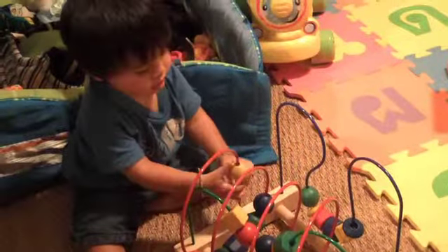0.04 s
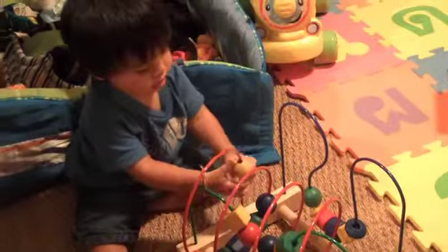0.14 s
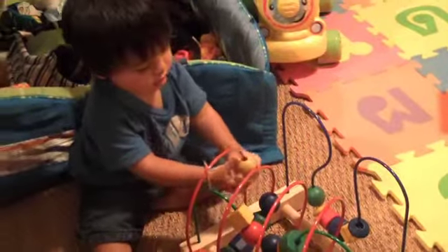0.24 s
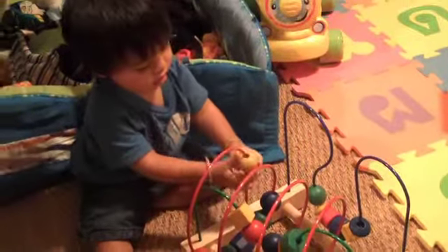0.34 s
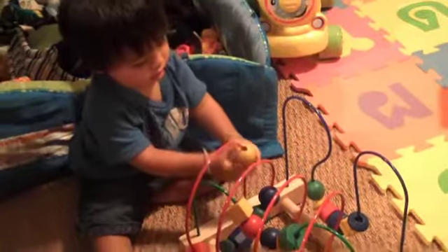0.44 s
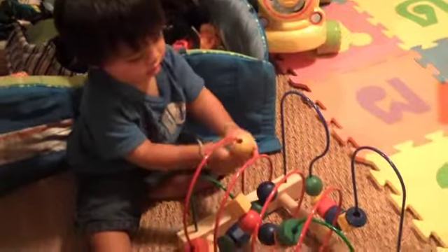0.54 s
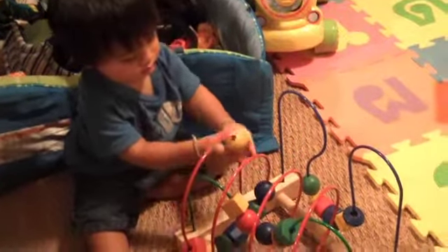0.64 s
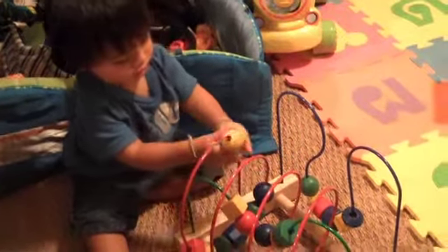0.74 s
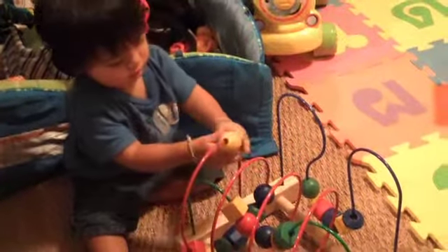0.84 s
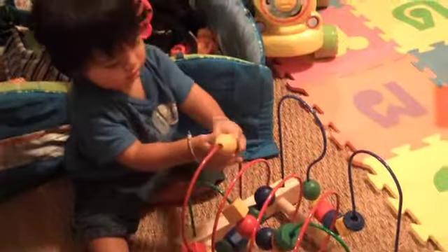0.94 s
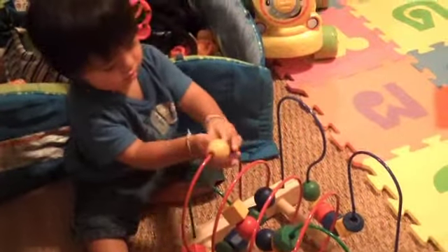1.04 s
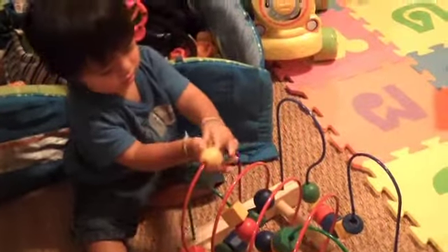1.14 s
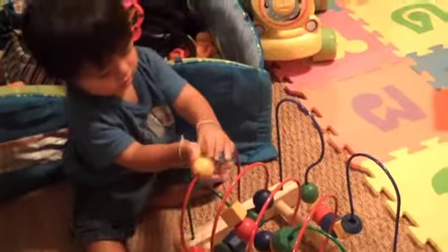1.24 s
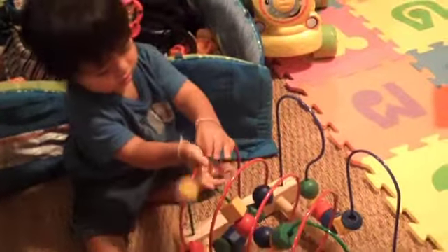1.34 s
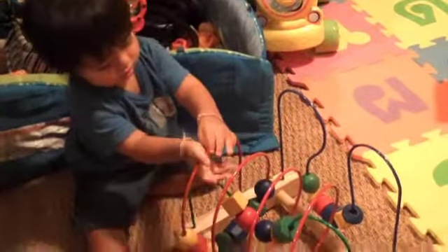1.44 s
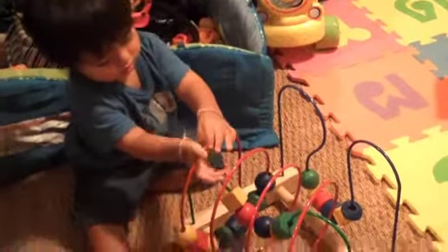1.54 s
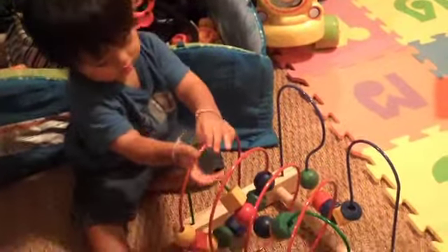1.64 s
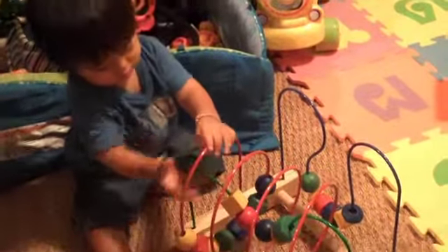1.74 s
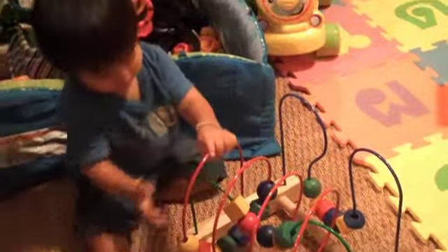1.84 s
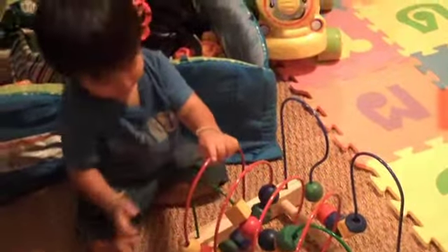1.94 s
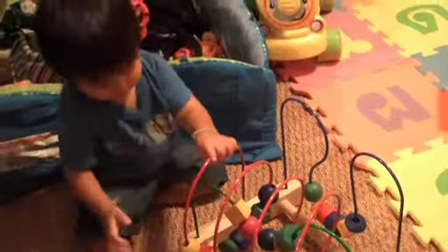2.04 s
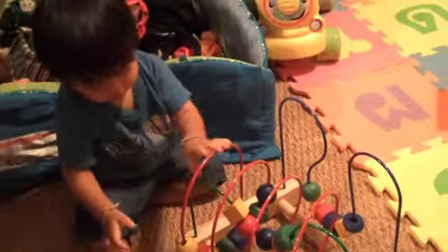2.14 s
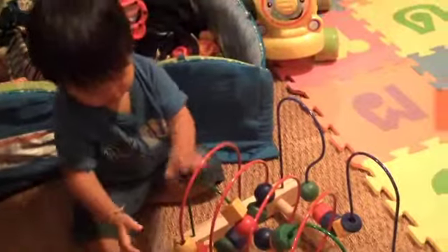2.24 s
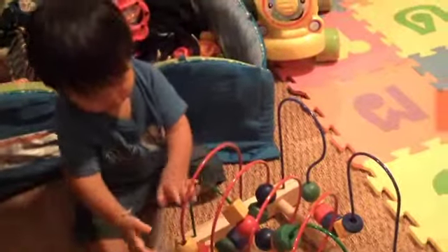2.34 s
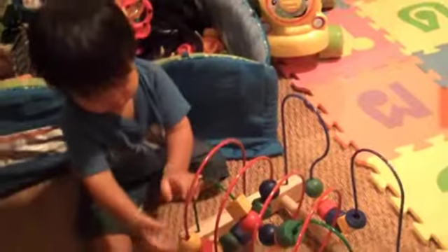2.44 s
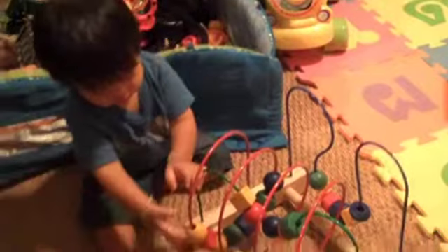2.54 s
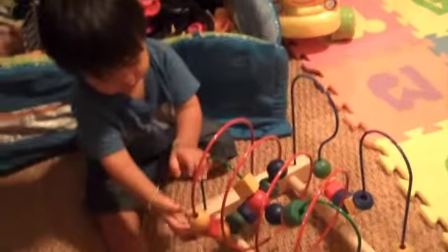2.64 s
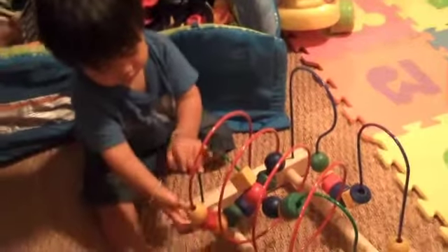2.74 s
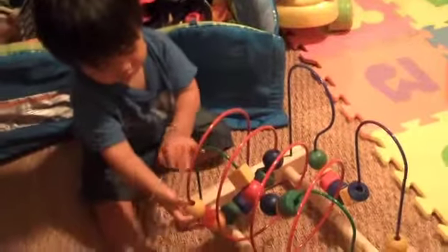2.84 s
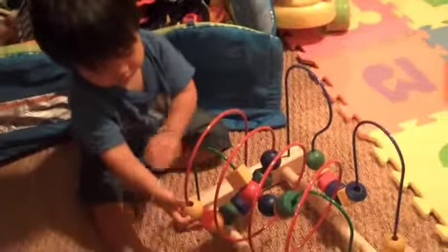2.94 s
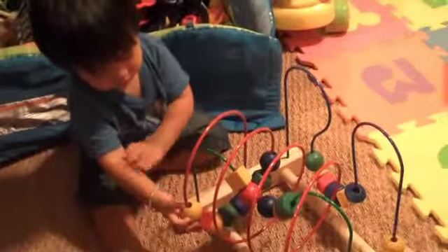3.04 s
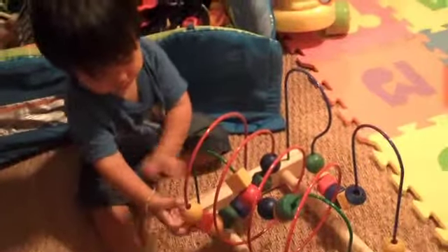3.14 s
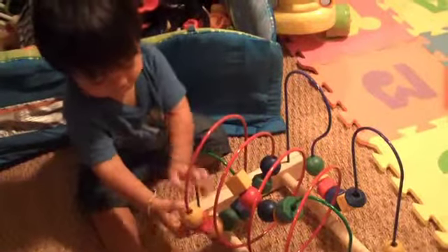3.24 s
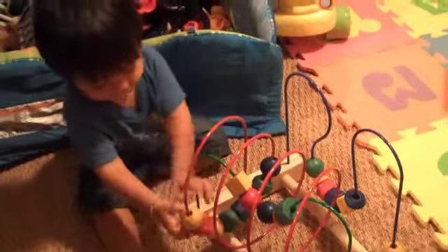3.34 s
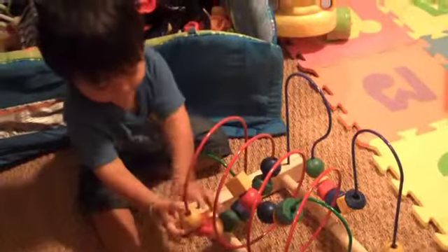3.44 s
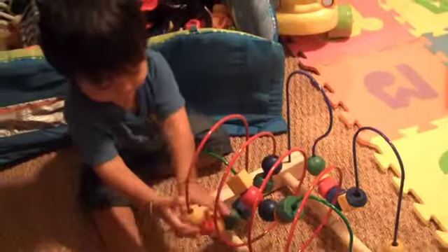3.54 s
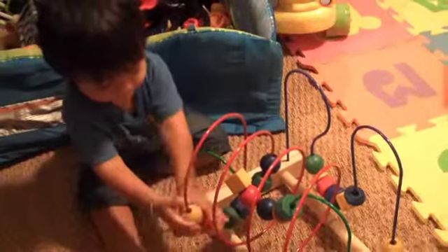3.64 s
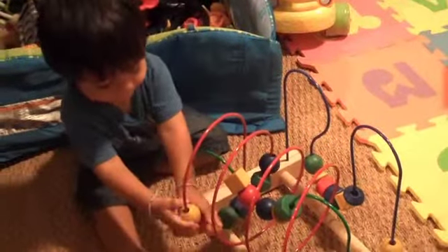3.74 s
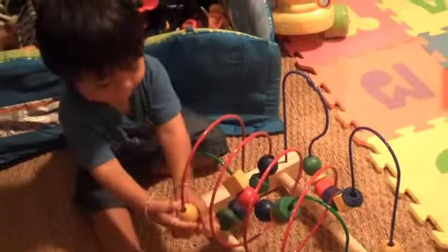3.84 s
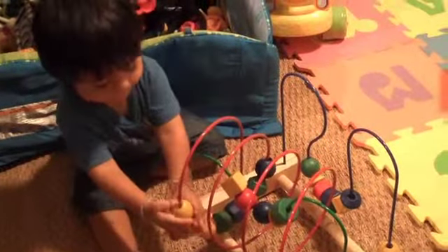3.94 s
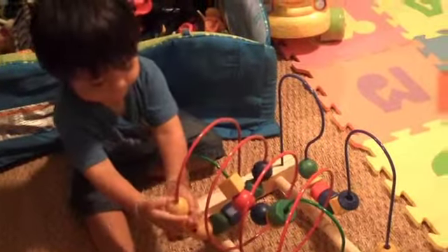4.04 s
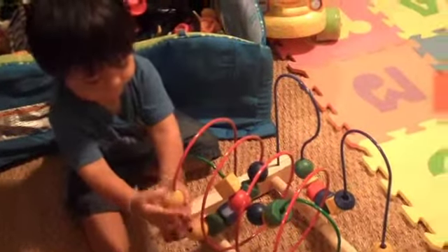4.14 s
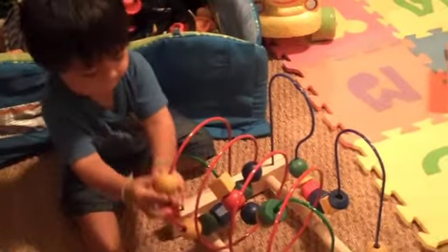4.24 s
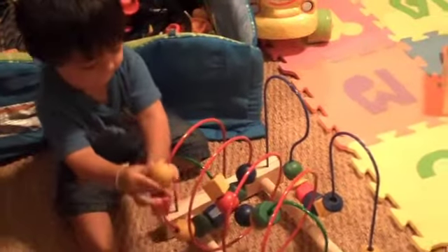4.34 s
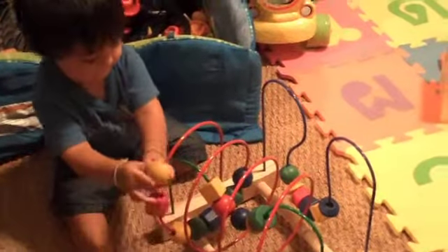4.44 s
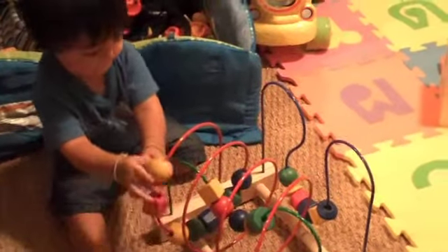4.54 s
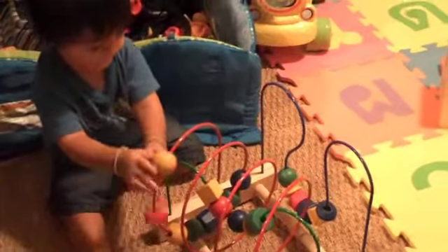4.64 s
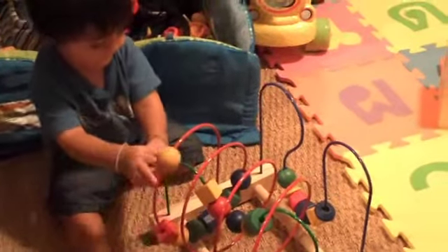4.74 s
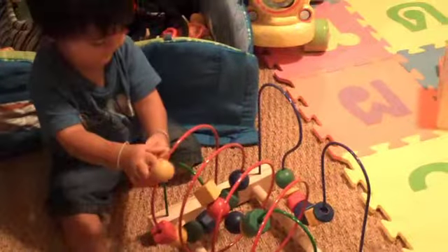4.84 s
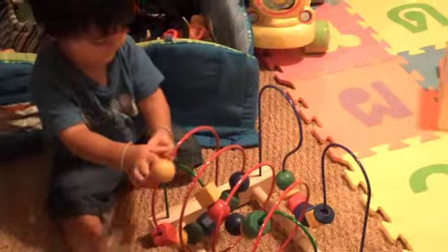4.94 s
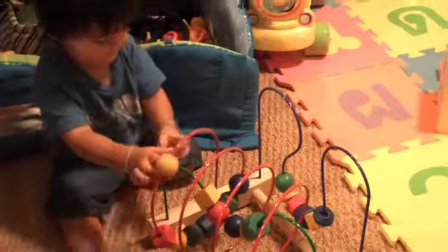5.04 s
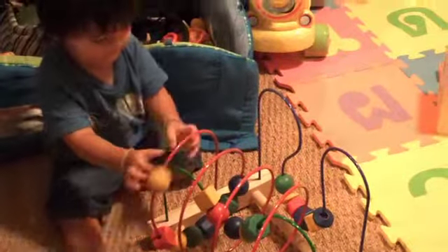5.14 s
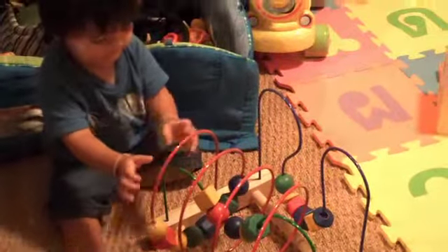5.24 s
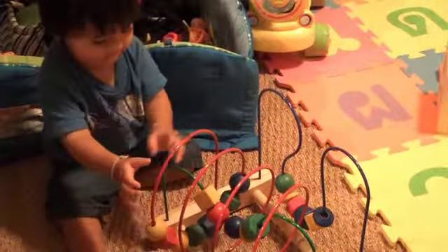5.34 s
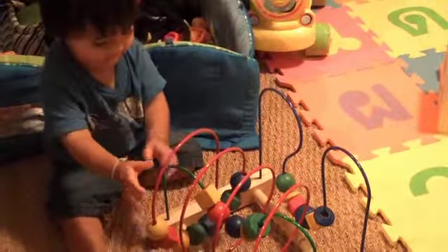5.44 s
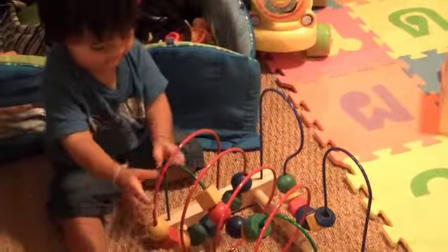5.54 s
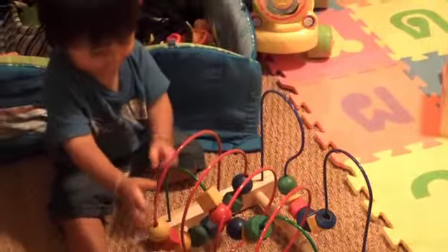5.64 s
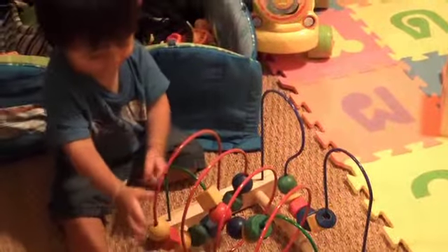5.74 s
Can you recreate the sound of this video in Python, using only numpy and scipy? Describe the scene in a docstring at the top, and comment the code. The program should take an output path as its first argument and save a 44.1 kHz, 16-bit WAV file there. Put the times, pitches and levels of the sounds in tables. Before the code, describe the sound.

A wooden bead maze is handled indoors, giving scattered light taps and three sharp clacks above a quiet hum.

```python
"""Wooden beads clack and tap on the wire loops of a bead maze as a child plays in a small carpeted room.
Three times a bead lands with a sharp clack, twice after a short skid; handled beads tap softly.
These contacts make the wooden frame and its wires ring. Fingers brush and rub faintly, and there are
soft low thumps. Under it all lie a throbbing appliance hum and still room air."""
import sys
import numpy as np
from scipy import signal
from scipy.fft import rfft, irfft, next_fast_len
from scipy.io import wavfile
from scipy.ndimage import uniform_filter1d

SR = 44100
rng = np.random.default_rng(int(sys.argv[2]) if len(sys.argv) > 2 else 0)


def to_wav(sig):
    """Store sig (one row per channel, or 1-D mono) as 16-bit WAV at the path in sys.argv[1].

    Samples outside -1..1 are clipped; the rate is SR.
    """
    pcm = np.clip(np.atleast_2d(sig), -1, 1) * 32767
    pcm = np.round(pcm).astype(np.int16)
    wavfile.write(sys.argv[1], SR, pcm.T)  # frames by channels


N = 254623
T = np.arange(int(.5 * SR)) / SR  # time since a hit [s]

# appliance hum: (pitch [Hz], level against the strongest tone [dB])
HUM_TONES = [(237, 0), (563, -15), (207, -16.5)]
# room air: (frequency [Hz], level [dB])
AIR_SPECTRUM = [(20, -0.5), (60, -15.5), (160, -14.5), (300, -13), (600, -15), (1000, -17.5), (1640, -20),
                (3500, -28), (7100, -35.5), (8500, -46.5), (11000, -66)]
# beads nudged against wire and neighbours: (time [s], level [dB], boosted pitch [Hz], contact length [s])
BEAD_TAPS = [(1.248, -65, 2870, .0016), (1.4195, -38.5, 2850, 0.00096), (2.544, -40, 2840, 0.012),
             (2.561, -44.5, 2280, .003), (2.6422, -43.5, 2990, 0.0032), (2.789, -59, 2010, .0018),
             (2.873, -56.5, 1850, 0.0012), (3.206, -58, 1900, .001), (3.235, -41, 2890, 0.00089),
             (3.540, -50.5, 1900, 0.0056), (3.613, -52.5, 2900, .0018), (3.618, -45.5, 2900, 0.0011),
             (3.702, -58, 3320, .0005), (3.824, -57.5, 1860, .001), (3.88, -59, 2400, .001),
             (4.162, -52, 2030, .0016), (4.317, -51, 1870, 0.00085), (4.694, -41, 1200, 0.0032),
             (4.934, -61.5, 1190, .0027), (4.995, -44.5, 2186, .002), (5.149, -61.5, 1930, .0019),
             (5.212, -60.5, 2200, .001), (5.251, -36.5, 2800, 0.0026)]
# tones of a bead held against its wire: (pitch [Hz], level [dB], time to fade by 60 dB [s])
HELD_BEAD_TONES = [(1053, -9.5, 0.14), (1175, -5.5, 0.184), (1250, -9.5, 0.37), (1408, -13.5, 0.054),
                   (1767, -5, 0.21), (1880, -3, .095), (2080, -9, .18), (2203, -1, .15), (2240, -12, .14),
                   (2333, -2, 0.158), (2480, -15.5, 0.32), (2750, -8.5, 0.089), (2891, 2, 0.067),
                   (2934, -8, 0.026), (3070, -19.5, 0.18), (3014, -6.5, 0.17), (3404, -2, .1),
                   (3900, -6, .094), (4023, 0.5, 0.095), (4324, -2, 0.074)]
# wooden clatter as the room returns it: (frequency [Hz], level [dB])
CLATTER_SPECTRUM = [(150, -29), (700, -16.5), (960, -12), (1080, 4), (1330, 3.5), (1500, -4), (1850, 5),
                    (2350, -3), (2570, 0), (2930, 4), (3550, -2), (5000, -8), (6500, -15.5), (8500, -33)]
# beads skidding down a wire: (start [s], end [s], first level [dB], last level [dB])
BEAD_SKIDS = [(1.341, 1.407, -51.5, -54.5), (4.671, 4.703, -46, -47.5)]
# beads landing: (time [s], ring level [dB], boosted pitch [Hz], snap level [dB], snap pitch [Hz],
# snap fade time [s], thud level [dB])
BEAD_LANDINGS = [(1.4624, -31.5, 2900, -9.5, 4950, 0.0048, -24.5),
                 (4.7127, -28.5, 2810, -15.5, 4730, 0.0058, -31.5),
                 (5.2747, -30, 2336, -8.5, 5550, 0.0018, -30.5)]
# tones of the frame and wires: (pitch [Hz], level [dB], time to fade by 60 dB [s])
FRAME_TONES = [(1157, -12.4, 0.29), (1266, -4.7, 0.2), (1375, -6.5, 0.22), (1585, -9.7, 0.18),
               (1733, -13.2, 0.27), (1828, -14.5, 0.32), (1877, -12.4, 0.23), (1981, -15.0, 0.36),
               (2073, -12.9, 0.29), (2114, -3.1, 0.23), (2194, -2.1, 0.15), (2243, -5.4, 0.21),
               (2377, 0.0, 0.18), (2466, -7.1, 0.23), (2600, -18.7, 0.35), (2646, -13.6, 0.33),
               (2737, -10.0, 0.23), (2786, -9.6, 0.21), (2875, -0.7, 0.15), (3027, -4.1, 0.15),
               (3161, -15.0, 0.27), (3457, -14.3, 0.23), (3593, -13.1, 0.21), (3778, -12.5, 0.21),
               (3937, -12.2, 0.18), (4027, -9.4, 0.16), (4140, -14.1, 0.2), (4238, -15.9, 0.23),
               (4325, -19.4, 0.28), (5064, -17.5, 0.22)]
# soft low thumps: (time [s])
LOW_THUMP_TIMES = [1.809, 1.843, 5.069, 5.638]
# fingers brushing a wire: (frequency [Hz], level [dB])
BRUSH_SPECTRUM = [(2500, -14), (4000, 0.5), (4700, -8.5), (5500, -3), (6200, -16), (7100, -1.5),
                  (8500, -29)]
# wood rubbing on wire: (frequency [Hz], level [dB])
RUB_SPECTRUM = [(800, -20), (1200, -0.5), (1550, -2), (2100, -8), (3000, -12), (5000, -20),
                (9000, -39.5)]


def gain(db):
    """Turn decibels into a number to multiply by."""
    return 10 ** (np.asarray(db) / 20)


def unit(x):
    """Scale a signal to an average strength (rms) of 1."""
    return x / np.sqrt(np.mean(x ** 2))


def fade(seconds):
    """Die away after a hit, falling 60 dB in the given time."""
    return np.exp(-np.log(1000) * T / seconds)


def shape(x, curve):
    """Filter by a curve of dB against Hz, keeping hits sharp (minimum phase)."""
    size = 2 * next_fast_len(len(x))
    hz = np.maximum(np.fft.rfftfreq(size, 1 / SR), 1)
    cepstrum = irfft(np.log(gain(curve(hz))))
    # fold the filter so that nothing sounds before the hit
    cepstrum[1:size // 2] *= 2
    cepstrum[size // 2 + 1:] = 0
    return irfft(rfft(x, size) * np.exp(rfft(cepstrum)))[:len(x)]


def noise(spectrum, size):
    """Noise of strength 1, coloured by (frequency [Hz], level [dB]) points."""
    hz, db = np.transpose(spectrum)
    bins = np.maximum(np.fft.rfftfreq(size, 1 / SR), 1)
    strength = gain(np.interp(np.log(bins), np.log(hz), db))
    return unit(irfft(strength * np.exp(2j * np.pi * rng.random(len(bins))), size))


def drift(rate_hz):
    """A slow, smooth random wander of strength 1."""
    hold = int(SR / rate_hz)
    steps = np.repeat(rng.standard_normal(N // hold + 1), hold)
    return unit(uniform_filter1d(uniform_filter1d(steps, hold), hold)[:N])


def add(track, start_s, sound):
    """Mix a sound into the track at the given time."""
    i = int(start_s * SR)
    track[i:i + len(sound)] += sound[:N - i]


def hum_and_air():
    """An appliance hum throbs evenly and wanders a little, over soft air noise."""
    throb_hz, throb_db, peak_s = 3.16, 2.3, 0.23
    t = np.arange(N) / SR
    tones = sum(gain(db) * np.sqrt(2) * np.sin(2 * np.pi * hz * t + 0.13 * drift(2.9))
                for hz, db in HUM_TONES)
    throb = np.cos(2 * np.pi * throb_hz * (t - peak_s))
    hum = tones * gain(-65.5 + throb_db * throb + drift(7))
    air = noise(AIR_SPECTRUM, N) * gain(-66.5 + .4 * drift(5))
    return hum + air


def toy_ring(tones, treble_db, boost_hz, boost_db, tones_db, clatter_s, room_db):
    """One hit on the toy: ringing tones, a quick clatter and the room's fading echo."""
    hz, db, fade_s = np.transpose(tones)[:, :, None]
    # every hit shares its energy among the tones a little differently
    share = gain(db + rng.standard_normal(db.shape))
    share /= np.sqrt(np.sum(share ** 2) / 2)
    waves = np.sin(2 * np.pi * (hz * T + rng.random(hz.shape)))
    ringing = np.sum(share * fade(fade_s) * waves, axis=0)
    clatter = noise(CLATTER_SPECTRUM, len(T)) * (fade(clatter_s) + gain(room_db) * fade(0.45))
    # a harder hit holds more treble; the spot where it lands boosts one pitch
    treble = lambda f: treble_db / (1 + (3500 / f) ** 8)
    boost = lambda f: boost_db * np.exp(-(np.log(f / boost_hz) / 0.037) ** 2)
    return shape(gain(tones_db) * ringing + gain(-3.5) * clatter, lambda f: treble(f) + boost(f))


def bead_taps():
    """Each light tap builds up while the bead chatters on its wire; the hand damps the ring."""
    out = np.zeros(N)
    for start, db, boost_hz, contact_s in BEAD_TAPS:
        treble_db = 0.74 * (db + 32)  # firmer taps are brighter
        ring = toy_ring(HELD_BEAD_TONES, treble_db, boost_hz, boost_db=6.5,
                        tones_db=-2.5, clatter_s=0.097, room_db=-17.5)
        add(out, start, gain(db) * ring * np.minimum(T / contact_s, 1))
    return out


def bead_skids():
    """A sliding bead chatters in tiny dull contacts that grow as it gathers speed."""
    contacts_per_s = 1500
    out = np.zeros(N)
    for start, end, first_db, last_db in BEAD_SKIDS:
        size = int((end - start) * SR)
        progress = np.arange(size) / size
        contacts = (rng.random(size) < contacts_per_s / SR) * rng.standard_normal(size)
        speed = np.minimum(2 * progress, 1)  # the bead starts from rest
        force = unit(contacts) * speed * gain(first_db + (last_db - first_db) * progress)
        ring = toy_ring(HELD_BEAD_TONES, treble_db=-22, boost_hz=2000, boost_db=4,
                        tones_db=-4, clatter_s=0.089, room_db=-20)
        add(out, start, signal.fftconvolve(force, ring) / np.sqrt(np.sum(ring ** 2)))
    return out


def bead_clacks():
    """A bead lands: its own brief high snap, a knock and a thud come first, then the toy rings."""
    out = np.zeros(N)
    for start, ring_db, boost_hz, snap_db, snap_hz, snap_s, thud_db in BEAD_LANDINGS:
        overtone = gain(-14.5) * np.sin(2 * np.pi * 1.27 * snap_hz * T)
        snap = (np.sin(2 * np.pi * snap_hz * T) + overtone) * fade(snap_s)
        knock = gain(-27.5) * np.sin(2 * np.pi * 2100 * T) * fade(.006)
        thud = -gain(thud_db) * fade(0.0032)
        # the contact takes a moment, which softens the highest treble
        hit = shape(gain(snap_db) * (snap + knock) + thud, lambda f: -30 / (1 + (8000 / f) ** 12))
        treble_db = 0.8 * (snap_db + 15.5)  # a sharper snap makes the ring brighter
        ring = toy_ring(FRAME_TONES, treble_db, boost_hz, boost_db=4.5,
                        tones_db=-2.5, clatter_s=0.14, room_db=-11)
        add(out, start, hit + gain(ring_db) * ring * (1 - fade(.006)))
    return out


def low_thumps():
    """Soft, very deep thumps that ebb away: downward at each clack, upward at the listed times."""
    out = np.zeros(N)
    thump = fade(0.7) * (1 - fade(0.0031))
    for start, *_, thud_db in BEAD_LANDINGS:
        add(out, start, -gain(thud_db - 19) * thump)
    for start in LOW_THUMP_TIMES:
        add(out, start, gain(-51.5) * thump)
    return out


def finger_brush():
    """Fingers brush along a wire with a thin hiss."""
    swell = np.interp(np.arange(N) / SR, [1.9, 2.02, 2.15, 2.3], [0, 1, 1, 0])
    return gain(-76.5) * swell * noise(BRUSH_SPECTRUM, N)


def bead_rubbing():
    """Fingers fidget with a bead: a faint, dull, uneven rubbing of wood on wire."""
    start_s, end_s, fade_s = 2.4, 5, 0.33
    t = np.arange(N) / SR
    effort = np.clip(np.minimum(t - start_s, end_s - t) / fade_s, 0, 1)
    return noise(RUB_SPECTRUM, N) * effort * gain(-81 + 2 * drift(20))


def scene():
    """The room and the toy, on one channel."""
    mix = hum_and_air() + bead_taps() + bead_skids() + bead_clacks()
    mix += low_thumps() + finger_brush() + bead_rubbing()
    return mix[None]


def record(dry):
    """A small recorder cuts off the treble above 8200 Hz."""
    return signal.sosfilt(signal.ellip(8, .2, 70, 8200, fs=SR, output="sos"), dry)


dry = scene()
out = record(dry)
to_wav(out)
```